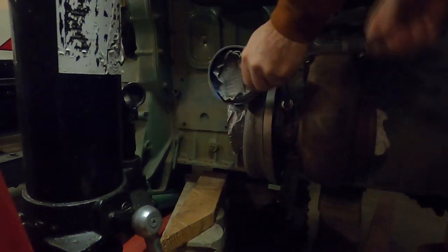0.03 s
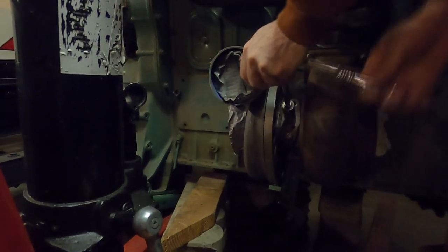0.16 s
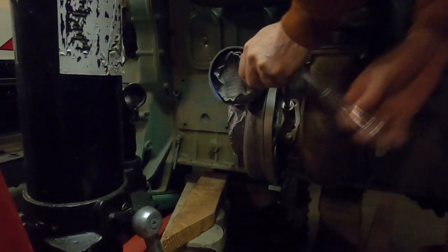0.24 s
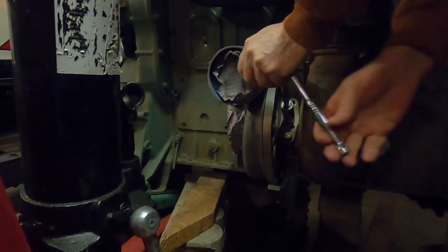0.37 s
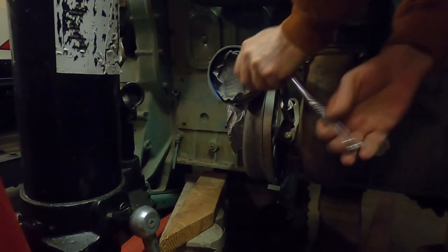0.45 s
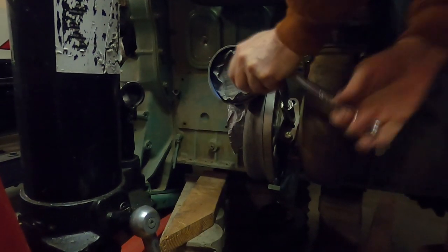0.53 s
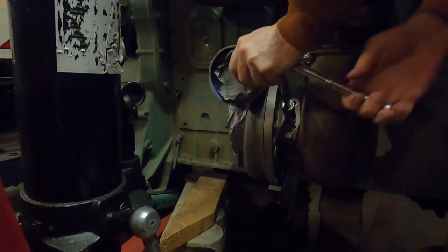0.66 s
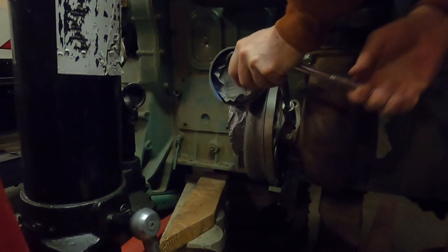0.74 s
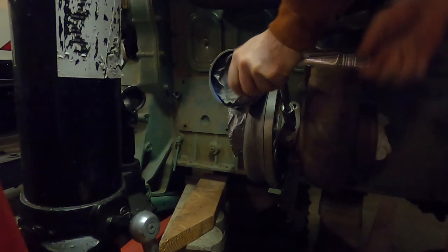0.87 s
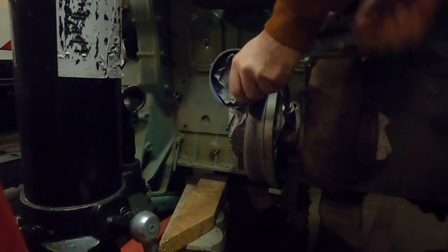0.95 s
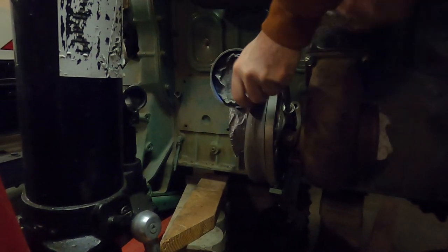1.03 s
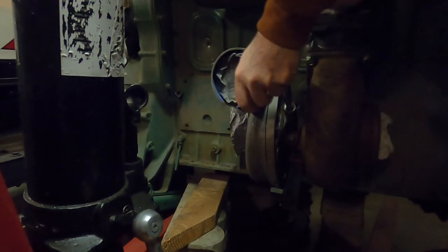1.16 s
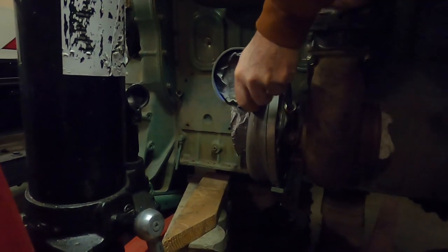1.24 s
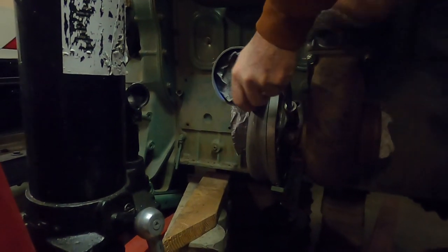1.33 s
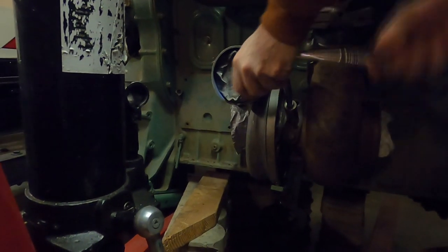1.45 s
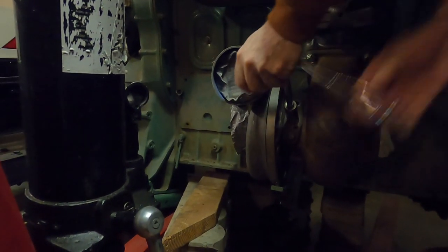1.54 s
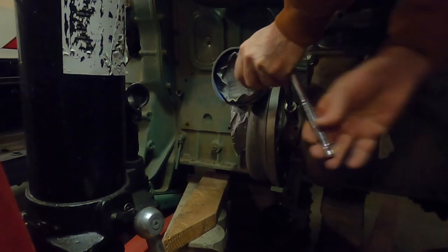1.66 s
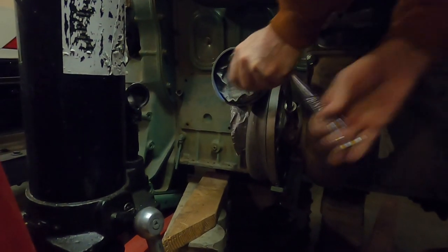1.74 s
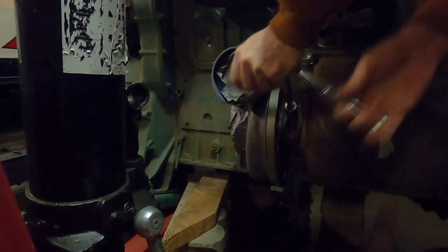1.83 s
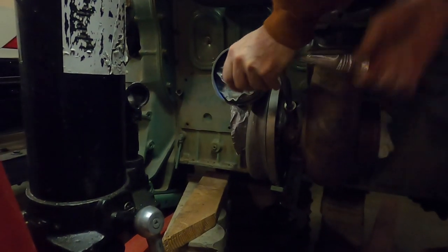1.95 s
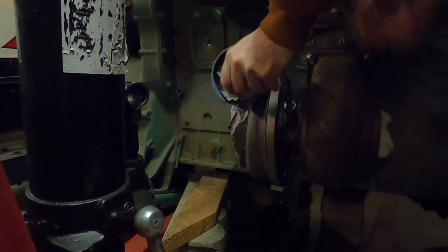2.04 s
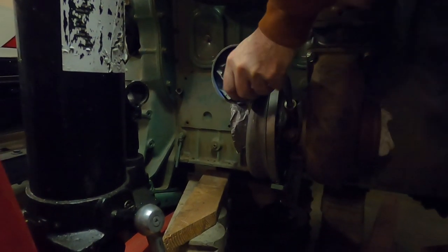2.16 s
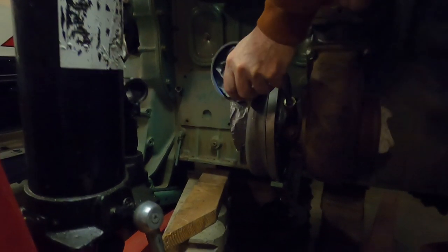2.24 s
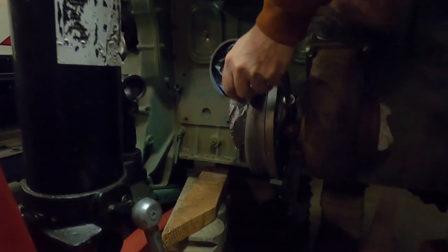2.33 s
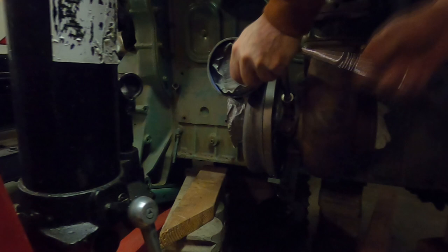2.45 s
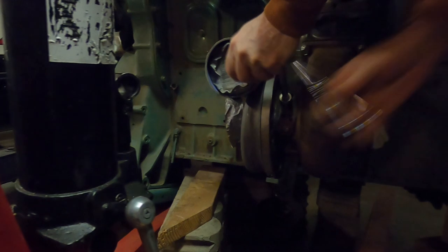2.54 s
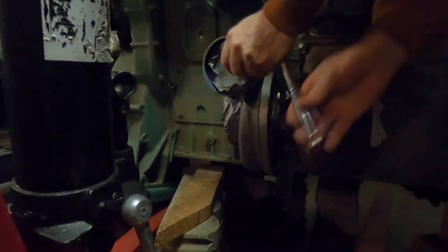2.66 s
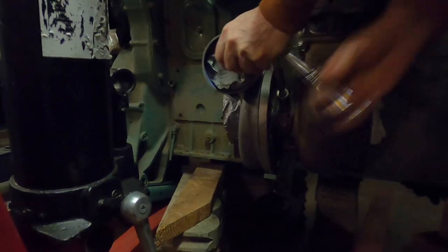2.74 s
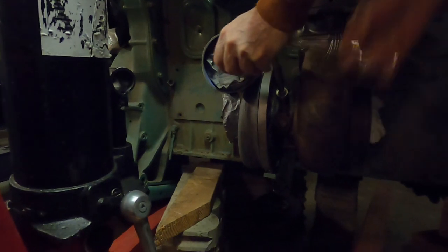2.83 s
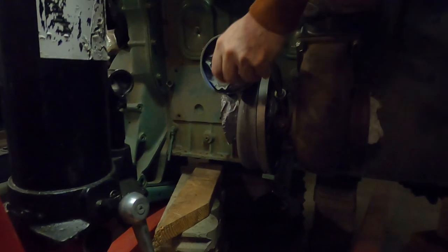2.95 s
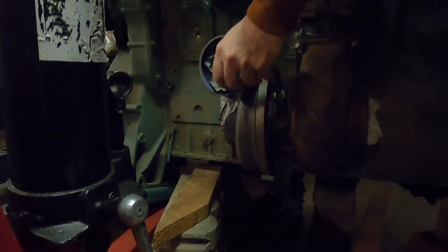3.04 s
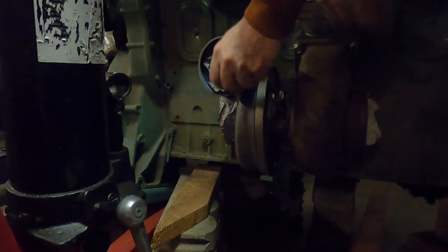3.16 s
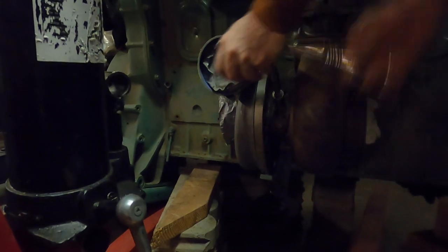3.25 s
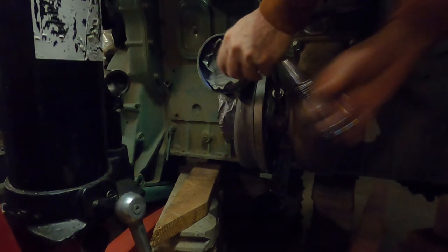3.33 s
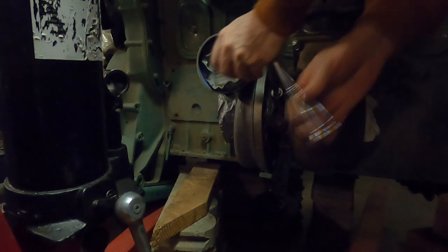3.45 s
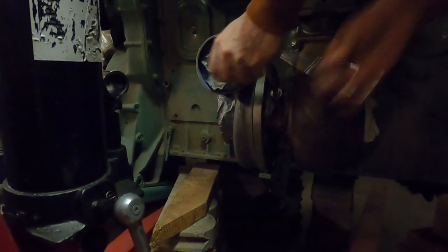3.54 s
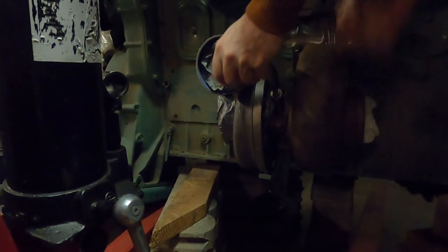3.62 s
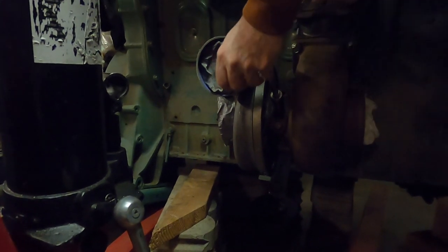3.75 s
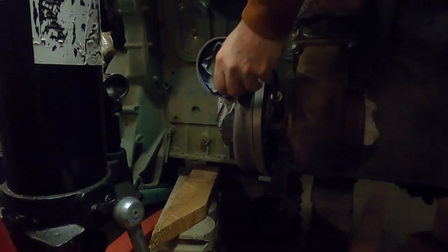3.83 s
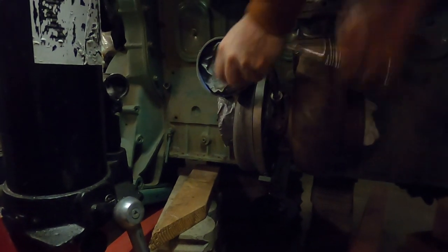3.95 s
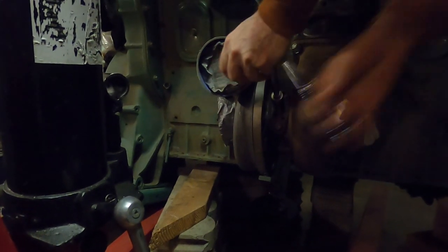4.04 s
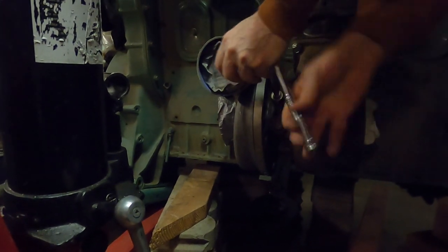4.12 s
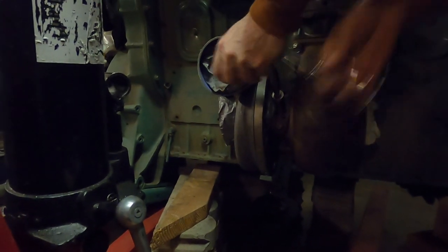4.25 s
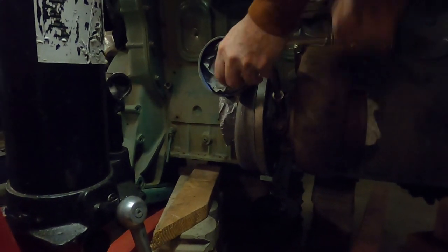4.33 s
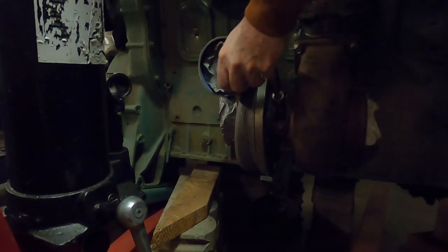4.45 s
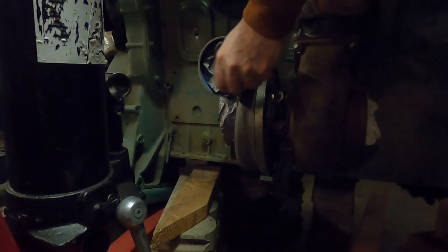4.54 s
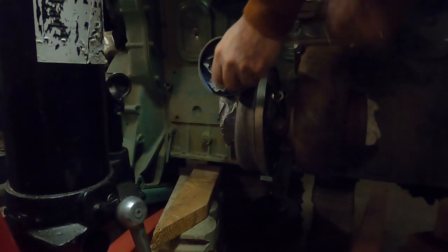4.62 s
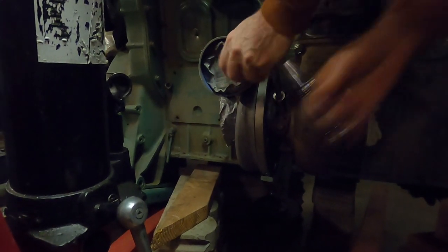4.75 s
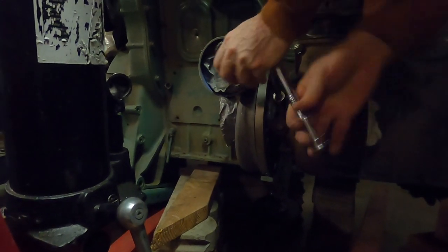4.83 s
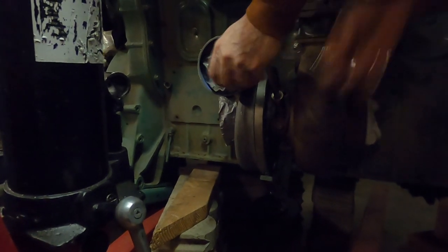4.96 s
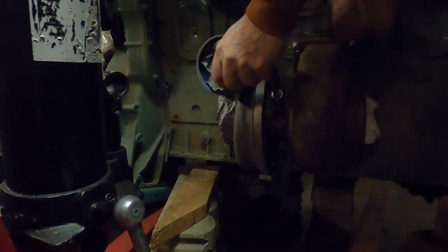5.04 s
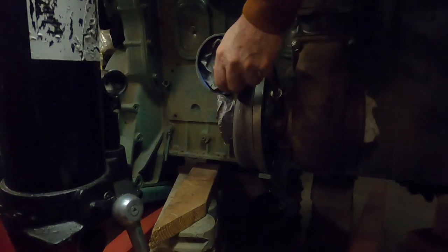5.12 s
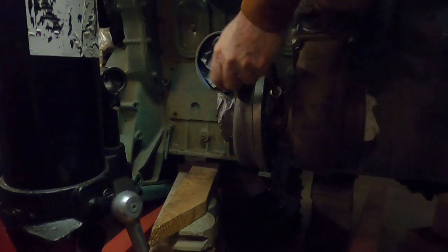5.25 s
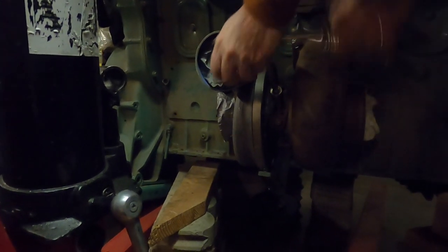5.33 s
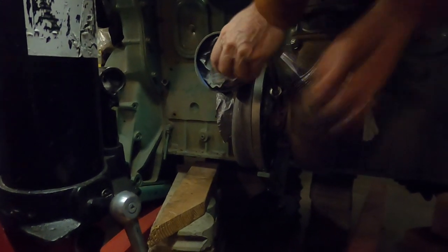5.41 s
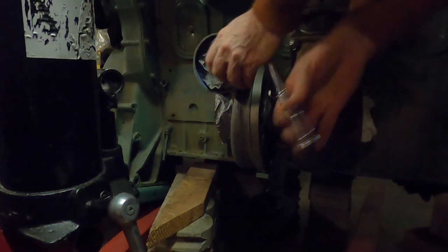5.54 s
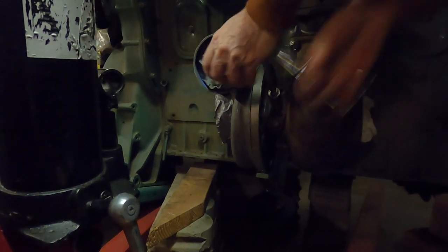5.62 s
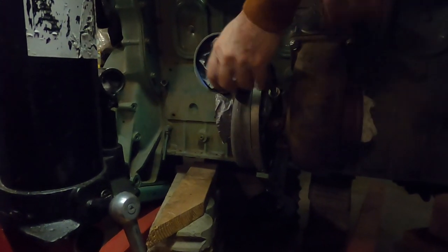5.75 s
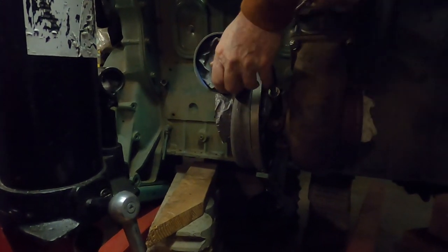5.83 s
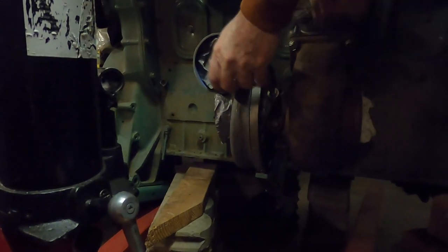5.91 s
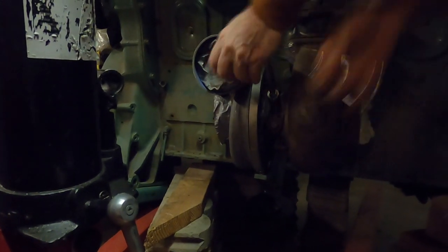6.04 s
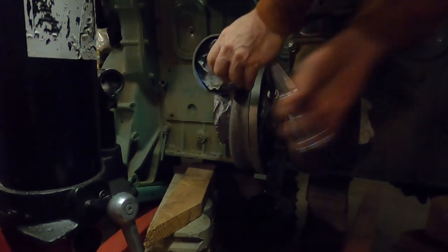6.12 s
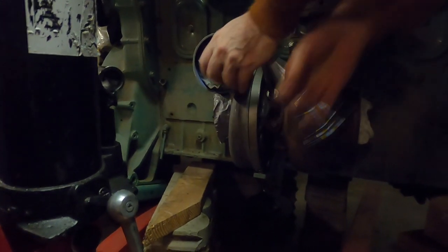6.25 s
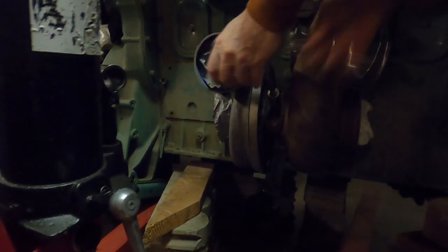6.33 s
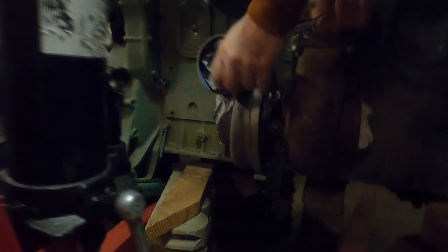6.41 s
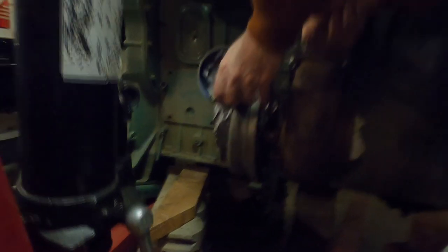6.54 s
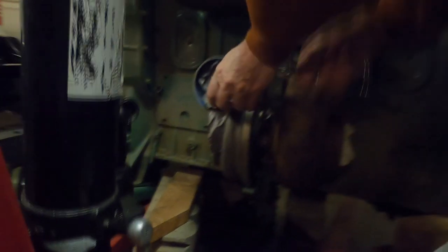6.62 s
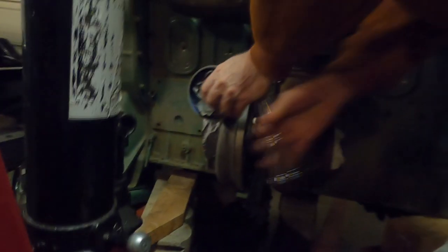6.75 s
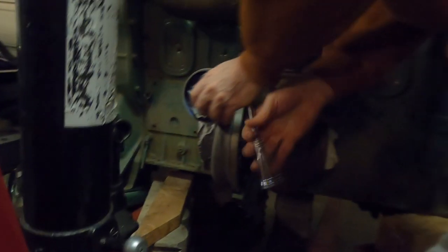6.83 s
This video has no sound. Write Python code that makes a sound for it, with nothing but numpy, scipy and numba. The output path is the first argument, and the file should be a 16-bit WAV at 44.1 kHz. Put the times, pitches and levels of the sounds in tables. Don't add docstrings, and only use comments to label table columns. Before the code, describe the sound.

Close, dry stereo sound of a ratchet wrench on a bolt in a cast gearbox, with short workshop echoes. Clicking starts at once, about twelve bright, ringing snaps until 0.37 s, then a double knock at 0.55. A quieter pull follows with faint rubbing and a soft hum until about 1.9. A strong clank lands at 1.31, and a knock at 1.40 leads into faster clicks to 1.73. Further runs come at 2.4-2.7, 3.2-3.43, 3.93-4.18, 4.67-4.86, 5.33-5.55, 6.04-6.21 and 6.69-6.83. Between them the socket clunks on metal, notably at 2.3, 3.16, 3.56, heavily at 3.87, then 4.57, 5.31, 5.93, 6.31 and 6.85. Gritty thread friction is clearest near 2.1 and 2.9. Cloth brushes faintly at 3.77 and 5.83; soft floor bumps fall at 1.96 and 6.72-6.85. A distant machine rumbles quietly throughout.

```python
import sys
import numpy as np
from scipy import signal
from scipy.fft import rfft, irfft
from scipy.io import wavfile
from scipy.ndimage import uniform_filter1d
from numba import njit

SR = 44100
rng = np.random.default_rng(int(sys.argv[2]) if len(sys.argv) > 2 else 0)


def invert_db(level):
    return 10 ** (np.asarray(level, dtype=float) / 20)


def unload_audio(sound):
    columns = np.transpose(np.atleast_2d(sound))
    steps = np.round(np.clip(columns, -1, 1) * 32767)
    wavfile.write(sys.argv[1], SR, steps.astype(np.int16))


N = 303408
PUSH_S = 0.15

# hz, db_per_hz
SNAP_COLOUR = [(500, -23.5), (1800, 0.5), (5000, 5), (8000, 2.5), (11000, -12), (12500, -10.5),
               (14500, -13), (16000, -25)]
BLOW_COLOUR = [(300, -25), (700, -14), (1500, 3.5), (2800, -4), (4500, -17), (8000, -32.5)]
CLOTH_COLOUR = [(2500, 1), (4500, -2), (7000, -1), (9000, -11.5), (12000, -21)]
# hz, level_db, t60_s
CASE_MODES = [(619.2, -3, 0.11), (747.6, 2, 0.045), (844, -5.5, 0.1), (957.6, -10, 0.14)]
CASTING_MODES = [(1263.6, 3.5, 0.028), (1354, 4, 0.03), (1649, -0.5, 0.11), (1720, -2, 0.12),
                 (1974, -2.5, 0.038), (2215, -5, 0.11), (2306, -9.5, 0.3), (2485, -14, 0.24),
                 (2734, -9.5, 0.23), (3000, -10, 0.1), (3320, -5.5, 0.052)]


def on_log(hz, table, column=1):
    table = np.array(table, float)
    return np.interp(np.log(np.maximum(hz, 1)), np.log(table[:, 0]), table[:, column])


def shape(x, gain):
    n = x.shape[-1]
    return irfft(rfft(x) * gain(np.arange(n // 2 + 1) * SR / n), n)


def noise(spectrum, alike_hz):
    mid, side = rng.standard_normal((2, N))
    side = shape(side, lambda hz: hz / np.hypot(hz, alike_hz))
    top_hz = spectrum[-1][0]
    colour = lambda hz: invert_db(on_log(hz, spectrum)) / np.maximum(hz / top_hz, 1) ** 4
    x = shape(np.array([mid + side, mid - side]), colour)
    return x / np.sqrt(np.mean(x ** 2))


def walk(rate_hz):
    hold = int(SR / rate_hz)
    steps = np.repeat(rng.standard_normal(N // hold + 1), hold)
    return uniform_filter1d(uniform_filter1d(steps, hold), hold)[:N]


@njit
def ring(at, size, pole, rise, keep):
    out, z = np.zeros(N), 0j
    for k in range(len(at)):
        z, push = z * keep, size[k] * (1 - rise[k])
        end = at[k + 1] if k + 1 < len(at) else N
        for i in range(at[k], end):
            z = z * pole[k] + push
            push = push * pole[k] * rise[k] + 1e-30
            out[i] = z.real
            if abs(z.real) + abs(z.imag) + abs(push.real) < 1e-7:
                break
    return out


def contact_rise(contact_ms, count):
    return np.exp(-1000 / (contact_ms * SR)) * np.ones(count)


def strike(s, db, modes, contact_ms, keep=0.61, scatter_db=-1.0, detune=0.032, apart_hz=16000,
           free_db=0, uneven_db=2.0, bend=0):
    out, at = np.zeros((2, N)), (s * SR).astype(np.int64)
    rise = contact_rise(contact_ms, len(s))
    for hz, mode_db, t60_s in modes:
        chance = rng.standard_normal((len(s), 6)).T
        mode_hz = hz * (1 + bend / 100 + detune * chance[0])
        ring_s = t60_s * invert_db(free_db + uneven_db * chance[1])
        pole = np.exp(2j * np.pi * mode_hz / SR - np.log(1000) / (ring_s * SR))
        size = invert_db(db + mode_db + scatter_db * chance[2]) * np.exp(3j * chance[3])
        skew = np.exp(hz / apart_hz * (1j * chance[4] + 0.15 * chance[5]))
        out += [ring(at, size * port, pole, rise, keep) for port in (skew, 1 / skew)]
    return out


def burst(s, db, t60_s, contact_ms):
    pole = np.full(len(s), np.exp(-np.log(1000) / (t60_s * SR)) + 0j)
    return ring((s * SR).astype(np.int64), invert_db(db) + 0j, pole, contact_rise(contact_ms, len(s)), 0.6)


def lead_in(s, db, t60_s):
    return burst(N / SR - s[::-1], db[::-1], t60_s, 0.27)[::-1]


def machine():
    # start_s, level_db
    load = [(0.0, -52), (0.04, -56), (1.609, -62), (1.82, -57), (2.51, -61.5), (2.97, -52), (3.01, -60.5),
            (3.27, -54), (3.39, -61.5), (3.64, -53), (3.68, -62.5), (4.88, -60), (5.17, -66.5),
            (5.23, -59.5), (6.86, -59.5), (6.88, -55.5)]
    # hz, db_per_hz
    roar_colour = [(20, -3.5), (40, -4), (90, -6), (200, -7.5), (350, -18), (1200, -38.5)]
    # order_hz, width_hz, level_db
    shaft = [(42.3, 7.8, -6), (84.4, 12, 7.5), (131, 14, -3), (180, 11, -7)]
    level_db = np.interp(np.arange(N) / SR, *np.transpose(load))
    orders = lambda hz: sum(invert_db(db + 8.0) / np.hypot(1, 2 * (hz - f) / width) ** 2 for f, width, db in shaft)
    roar = noise(roar_colour, 550)
    rumble = roar * invert_db(0.49 * (level_db.mean() - level_db)) + shape(roar, orders) * invert_db(2.3 * walk(8.0))
    return rumble / np.std(rumble) * invert_db(level_db + 2.0 + 0.86 * walk(9.0) + 2.0 * walk(30))


def effort(column, floor_db):
    # start_s, end_s, thread_rub_db, cloth_hiss_db
    drives = [
        (0.405, 0.732, -67, -75.5),
        (0.787, 1.27, -75, -88),
        (1.988, 2.267, -64.5, -94),
        (2.756, 3.095, -62, -97),
        (3.496, 3.71, -84, -96),
        (4.253, 4.547, -80.5, -91.5),
        (5.045, 5.279, -91.5, -97),
        (5.658, 5.804, -84, -87),
        (6.347, 6.543, -66.5, -84),
    ]
    t = np.arange(N) / SR
    hump = lambda start, end: np.clip(np.minimum(t - start, end - t) / PUSH_S + .5, 0, 1)
    return invert_db(floor_db) + sum(invert_db(row[column]) * hump(row[0], row[1]) for row in drives)


def thread():
    # hz, db_per_hz
    rub_colour = [(500, -14.5), (900, -6), (1400, 1.5), (2200, -2.5), (3000, -14.5), (5000, -25)]
    return noise(rub_colour, 2500) * effort(column=2, floor_db=-76.5) * invert_db(-7.0 + 2.0 * walk(50))


def cloth():
    return noise(CLOTH_COLOUR, 4000) * effort(column=3, floor_db=-85) * invert_db(3.5 + 1.5 * walk(27))


def teeth():
    # start_s, snap_db, low_ring_db, high_ring_db, head_db (last three over snap)
    swing_1 = [(0.0002, -48, -18.5, -17, -22.5), (0.0114, -32.5, 2.5, 9, 1.5), (0.0376, -33, -11.5, 8, -2),
               (0.0698, -33, -16, 11, -5.5), (0.102, -33, -14.5, 14, 3), (0.138, -34, -20, -9.5, -9.5),
               (0.175, -33, -13.5, -10, -12.5), (0.2109, -34, 4.5, -3.5, -14.5),
               (0.246, -37, 0.5, -18, -14), (0.284, -35, -8.5, -25.5, 0), (0.325, -35.5, -9, -19.5, 5),
               (0.3706, -34.5, 2.5, 9.5, 7.5)]
    swing_2 = [(1.4174, -34, 3, -1.5, 5), (1.4382, -35.5, 5, 4.5, 5), (1.4569, -35.5, 5.5, 8, 15.5),
               (1.4764, -36, 1.5, -2, 9.5), (1.5006, -36, -7, 10.5, 9), (1.5291, -38.5, 8.5, 9.5, 15),
               (1.557, -35.5, 6, -2.5, 11), (1.5824, -34, 11, 8.5, 2), (1.6065, -33.5, 12.5, 9.5, 1),
               (1.6284, -38, 16.5, 16, 11), (1.6535, -33.5, 11, 9, -5.5), (1.6826, -34.5, 10, 9.5, -3),
               (1.73, -35, 11, 8, 11)]
    swing_3 = [(2.4021, -37, 6.5, 13, -5), (2.4259, -41, 12, 12, 7), (2.4476, -37, 7.5, -16, 5),
               (2.467, -37.5, 8, 1, 9.5), (2.4862, -38, 3, 2, 7), (2.5061, -38.5, 8, -17, -3),
               (2.53, -36.5, -7, -12, -9), (2.5553, -36.5, -1, -23, -9), (2.5767, -38.5, 6.5, -14.5, -14),
               (2.5983, -35, 3.5, -15, -14), (2.6216, -36.5, 0.5, -5, -19), (2.6454, -38.0, -2.5, 1, -21),
               (2.6843, -39.5, 1, 5.5, -6.5)]
    swing_4 = [(3.2036, -65, 23, 11, -22), (3.22, -63.5, 23, 13, -13.5), (3.2421, -33.5, 8.5, -1, -22),
               (3.258, -34.5, 1, 18.5, -2), (3.2745, -36.5, -10, 18, -1), (3.29, -31, -10, 10, -9),
               (3.3055, -35, 0, -5.5, 2.5), (3.3208, -34.5, 0, -4.5, -5), (3.3395, -34, 6, 10.5, -12.5),
               (3.3597, -36.5, -11, 5, -16), (3.3799, -34.5, -3, -13, -2), (3.4027, -38, 5.5, 0, -8.0),
               (3.432, -36, -3, -16, 0)]
    swing_5 = [(3.9308, -46, 4, -3, -22.5), (3.967, -34, -9.5, -5, -10.5), (3.9874, -36.5, -13, -10, 0.5),
               (4.003, -37.5, -1, 9.5, 12), (4.0173, -35.5, -2.5, -15, 13), (4.0299, -38, 11.5, -4.5, 21.5),
               (4.044, -34, 0.5, -24, 7.5), (4.0593, -30, 1.5, 2, 6), (4.0769, -33.5, -6, -4, -4),
               (4.0958, -30.5, 1.5, 5, 7.5), (4.1164, -33, 10.5, 7, 7.5), (4.1392, -32, 4, 5.5, 5),
               (4.1815, -36, 7, 7, 2)]
    swing_6 = [(4.668, -36.5, 7.4, 18.5, -6.5), (4.688, -30.5, 1.5, 9.5, -9.5), (4.707, -35, 10, 17.5, 0.5),
               (4.7234, -35, 12, 16.5, -20), (4.7395, -36.5, 12, 8, 5.5), (4.756, -34.5, 5.5, -3.5, -7),
               (4.7712, -32, 10.8, 9, 1), (4.7912, -35.5, 13, -0.5, -2.5), (4.8119, -31.5, 9, -11, 2),
               (4.8315, -32.5, 5.6, -6, 3), (4.8553, -35.5, 7.4, -12.5, 0.5)]
    swing_7 = [(5.3344, -42, 7.5, 8, -22), (5.3577, -35.5, 2.5, -12, -11), (5.3774, -35.5, 3.5, -10, -9),
               (5.3916, -37.5, 9, 6, -10), (5.4051, -35.5, 9, -16, -24), (5.421, -34, 7.5, 16.5, -14.5),
               (5.4339, -31, 0.5, 4, -21), (5.4497, -32.5, -0.5, -0.5, -20), (5.4647, -34, 5, 6.5, -23),
               (5.4836, -32.5, 2.5, 5, -17.5), (5.5024, -35, -4, 14, -5), (5.524, -33.5, 1.5, 7, -1.5),
               (5.5486, -38, 1, 15, 4), (5.627, -59.5, 14.5, 19, -22)]
    swing_8 = [(6.038, -36, -16, 6.5, -1.5), (6.055, -36.5, -8, 9.5, 7), (6.0677, -40.5, 1.5, 14, 5),
               (6.0803, -37.5, 1.5, 8, 7.5), (6.0931, -32.5, -18, -17.5, 2), (6.108, -38.5, 5, 4, 10),
               (6.1242, -35, -12, -8, 2), (6.1418, -37, -8, -24, 0), (6.1638, -36, -4.5, 6, 9),
               (6.187, -35, 5.5, 8, 11.5), (6.2127, -37.5, 8, 9, 14.5)]
    swing_9 = [(6.6852, -35, 3, 4, 7.5), (6.7047, -36.5, 3, 6, 8.5), (6.72, -30, 1, 3, 0.5),
               (6.7355, -30.5, 2.5, 13, 5), (6.7486, -32.5, 1.5, 10, 11.5), (6.762, -33, 2.5, 14.5, 10),
               (6.779, -28.5, 0.5, 7, 2.5), (6.7945, -34, 12, 7.0, -7), (6.8118, -31, 9.5, 10, -10.5),
               (6.8333, -32.5, 3.5, 9, -9.5)]
    # pawl_landing_ms, low_ring_neighbours_db, tooth_chirp_db, lowest_casting_modes_db
    landings = [(0.71, 1, 4, -1.5), (0.43, -3.5, -5.5, -2), (.5, 4, 3.5, 0.5), (0.8, 8, -4, 5.5),
                (0.65, 5, -4, 1.5), (.7, -5, -4.5, -1), (0.95, 4.5, -1, 0), (0.93, 4.5, -11, 1.5),
                (0.87, 0, -5, 0)]
    bends = [(.6, .6), (0, -.3), (.2, .2), (0, 1), (0, -.3), (0, 0), (.6, .9), (0, 1.2), (0, -.1)]
    # first_tooth_db, midway_db, last_tooth_db
    slacks = [(-4, -3, -6), (-0.5, 4, -2), (1.5, 1, 3.5), (-9.5, -4.5, -4), (-6, -3, -1), (0, 3.5, 3.5),
              (-1, -3, -4.5), (0, 3.5, 1), (5.5, -1, -0.5)]
    # first_tooth_db, midway_db, last_tooth_db
    covers = [(6, -10.5, 2), (2.5, -1.5, 1), (-1, 4, -7.5), (-2.5, 0.5, -2.5), (-9.5, -4.5, 2),
              (-5.5, 1, -2), (-16, -1.5, -6), (0, -4, 8), (-5.5, -0.5, -4)]
    # first_tooth_db, midway_db, last_tooth_db
    presses = [(-5.5, -13.5, -4.5), (-4, -4.5, -4), (-1.5, 1.5, 0.5), (-3, -5.5, -2), (-17, -7.5, -2),
               (1, -5, -3.5), (0, -6.5, -12), (-5, -7.5, -3), (-8, -5, -5)]
    swings = [swing_1, swing_2, swing_3, swing_4, swing_5, swing_6, swing_7, swing_8, swing_9]
    blocks = []
    for swing, landing, bend, *grip in zip(swings, landings, bends, slacks, covers, presses):
        columns = np.transpose(swing)
        s = columns[0]
        steady = np.outer([*landing, *bend], np.ones(len(s)))
        sliding = [np.interp(s, np.linspace(s[0], s[-1], len(hold)), hold) for hold in grip]
        blocks.append(np.vstack([columns, steady, sliding]))
    rows = np.hstack(blocks)
    rows[-1] += 2.5 * rng.standard_normal(rows.shape[1])
    return rows


def pawl():
    # hz, level_db, t60_s
    low_ring = [(3874, 1.5, 0.048)]
    low_neighbours = [(4094, -7, 0.027), (3758, -9.5, 0.039)]
    high_ring = [(6975, 1.5, 0.036), (7130, -7, 0.04)]
    head_modes = [(9150, -2.5, 0.01), (9570, -3.5, 0.024), (9840, -4, 0.029)]
    cover_plate = [(10636, -1.5, .035), (11040, -6, 0.033)]
    # hz, level (added as db), t60_s
    overtones = [(13600, 0.0039, .02), (14500, 0.0036, .025)]
    # hz, level_db, t60_s
    tooth_chirps = [(5280, 2, 0.0076), (2120, -5, 0.017)]
    s, db, low, high, head, land_ms, near, chirp, deep, low_bend, high_bend, slack, cover, body = teeth()

    crack = burst(s, db + 1.0, 0.015, land_ms) + burst(s, db - 3.0, 0.066, 0.66 * land_ms)
    crack += lead_in(s, db - 1.0, 0.0064)
    rattle = noise(SNAP_COLOUR, 8000) * crack * invert_db(1.9 * walk(900))
    shake = noise(BLOW_COLOUR, 4700) * burst(s, db + body - 3.5, 0.099, 12.0)

    steady = .004
    handle = strike(s, db + low + 0.5, low_ring, 0.71 * land_ms, keep=0.15, scatter_db=0.44, detune=steady,
                    free_db=slack + .15 * (low - 6.0), uneven_db=-0.5, bend=low_bend)
    handle += strike(s, db + low + near - 0.6, low_neighbours, 0.43 * land_ms, keep=.15, scatter_db=4.0,
                     detune=0.017, free_db=0.65 * slack)
    handle += strike(s, db + high + 0.15, high_ring, 0.8 * land_ms, keep=.3, scatter_db=2.0, detune=steady,
                     free_db=0.58 * slack + 1.0, uneven_db=0.8, bend=high_bend)
    handle = handle * invert_db(1.8 * walk(300))

    loose = strike(s, db + head + 1.0, head_modes, 1.3 * land_ms, keep=0.35, scatter_db=3.0, detune=0.019,
                   apart_hz=9000)
    loose += strike(s, db + cover - 0.5, cover_plate, 0.12, keep=.3, scatter_db=1.5, detune=steady,
                    apart_hz=8000)
    loose += strike(s, db + .4 * head - 10.0, overtones, .6, detune=0.011)
    loose += strike(s, db + chirp, tooth_chirps, 0.67 * land_ms, keep=0, scatter_db=3.0, detune=0.05)
    loose = loose * (1 + .55 * walk(900))

    gearbox = strike(s, db + body - 17.5, CASE_MODES, 0.71, scatter_db=-1.0)
    gearbox += strike(s, db + body + deep - 9.5, CASTING_MODES[:2], 1.1, keep=0.8, scatter_db=3.5,
                      detune=0.01, free_db=1.5)
    gearbox += strike(s, db + body - 11.0, CASTING_MODES[2:], 1.0, keep=0.99, scatter_db=3.0,
                      detune=0.008, free_db=1.0)
    return rattle + shake + handle + loose + gearbox


def room(x):
    # band_hz, t60_s, level_db
    echo_bands = [(316, 0.27, -11.5), (960, 0.35, -20), (3050, 0.2, -20), (6050, 0.29, -14),
                  (11730, 0.22, -21.5)]
    t = np.arange(SR // 2) / SR
    echo = 0
    for hz, t60_s, db in echo_bands:
        band = shape(rng.standard_normal((2, len(t))), lambda f: np.exp(-np.log2((f + 1) / hz) ** 2))
        band = band * np.exp(-np.log(1000) * t / t60_s) * np.clip(t / 0.0033, 0, 1)
        echo = echo + invert_db(db) * band / np.sqrt(np.sum(band ** 2) / 2)
    echo = echo + 0.32 * echo[::-1]
    return signal.fftconvolve(x.mean(axis=0)[None], echo, axes=1)[:, :N]


def socket():
    # start_s, blow_db, case_db, rattle_db, upper_casting_db (last three over blow)
    knocks = [(0.5436, -42, -34, -10, -4.5), (0.5567, -31.5, -15, -6.5, -5), (1.2985, -51.5, -19, 3, 0),
              (1.3089, -21, -10.5, 5, 6.5), (1.396, -29, -18, -22, -18.5), (1.7886, -42, -8, -17, -16.5),
              (1.82, -39.5, -11, -14, -5), (1.8327, -33, -16.5, -11.5, -10.5),
              (2.3041, -26.5, -22, -14.5, -5), (2.7668, -35, -38.5, -18, -4.5),
              (3.156, -26, -15, -20, -11.5), (3.2004, -42.5, -28, 1, -12), (3.22, -37.5, -28, -5, 3.5),
              (3.5512, -42, -32, 11.5, 2), (3.558, -28, -23, -38, -25), (3.5649, -26.5, -24, -9.5, -4),
              (3.8553, -58, -14, -9, -3.5), (3.8661, -19, -13.5, -10, -8), (4.2512, -35.5, -15, -10, -5),
              (4.561, -57, -17.5, -4.5, -10), (4.5719, -24.5, -11, -6, 3), (4.962, -36.5, -24, -23, -25),
              (4.966, -30, -22.5, -14.5, -0.5), (5.029, -44, -18, -2.5, 4), (5.047, -53, -25, 2.5, -12.5),
              (5.069, -56, -26.5, 6, -19.5), (5.075, -46, -27, 5.5, -4.5), (5.3066, -25.5, -13.5, -8, -6.5),
              (5.637, -27.5, -20.5, -28, -14), (5.6512, -33.5, -38, -15.5, 2.5),
              (5.9349, -25, -28, -19.5, -1), (5.9892, -40, -21, -8, -9), (6.006, -35, -14, -20, -4.5),
              (6.278, -28.5, -28, -11, -5), (6.3112, -24.5, -14, -31, -4.5), (6.3977, -55.5, -22, 6, -14),
              (6.574, -30.5, -8, -20, -27), (6.6458, -33, -12, -18, -30), (6.846, -25.5, -18, -20, -10)]
    # start_s, lowest_casting_modes_db
    flange_hits = [
        (.5565, -4.5),
        (1.396, -11),
        (1.8325, -4.5),
        (2.3053, -14),
        (3.8659, 1),
        (5.3059, -1.5),
        (5.9349, 0),
        (6.574, 5),
    ]
    # hz, db_per_hz
    chink_colour = [(2500, -13), (4500, 0.5), (5600, -6.5), (6500, -4.5), (8500, -14), (11000, -24)]
    # hz, level_db, t60_s
    socket_modes = [(3760, -2, 0.12), (4150, -3, .12), (4240, -9, .12), (4730, -3.5, 0.11),
                    (4670, -1.5, 0.05), (4830, -3.5, 0.079), (5450, -4, 0.099), (6700, -8.5, .03)]
    s, db, thud, rattle, upper = np.transpose(knocks)
    grit = invert_db(5.4 * walk(500))
    blow = burst(s, db - 7.5, 0.038, 4.8) + burst(s, db - 21.0, 0.29, 29.0) + lead_in(s, db - 39.5, 0.12)
    blow = noise(BLOW_COLOUR, 7000) * blow * grit
    chink = burst(s, db + rattle - 7.5, 0.043, 1.5) + burst(s, db + rattle - 17.5, 0.071, 3.6)
    chink = noise(chink_colour, 12000) * chink * grit

    steady = .0015
    flange = sum(more_db * (np.abs(s - at_s) < .005) for at_s, more_db in flange_hits)
    body = strike(s, db + thud - 3.5, CASE_MODES, 1.1, scatter_db=-1.0, keep=0.56, detune=steady)
    body += strike(s, db + flange - 13.0, CASTING_MODES[:2], 0.39, keep=0.68, scatter_db=2.0, detune=steady)
    middle_db = db - 17.0 - 0.16 * (thud + 21)
    body += strike(s, middle_db, CASTING_MODES[2:5], 1.8, keep=0.68, scatter_db=-2.0, detune=steady)
    body += strike(s, db + upper - 15, CASTING_MODES[5:7], 1.1, keep=1.0, scatter_db=1.5, detune=steady)
    body += strike(s, db + upper - 9.5, CASTING_MODES[7:], 0.81, keep=0.82, scatter_db=0.7, detune=steady)
    body += strike(s, db + rattle - 16.5, socket_modes, 0.51, keep=0.9, detune=steady)
    buzzing = body * (1 + 0.5 * walk(250))
    return shape(blow + chink + buzzing, lambda hz: 1 / np.hypot(1, (hz / 9000) ** 5))


def sleeve():
    # start_s, level_db
    grit_ticks = [(0.559, -42.5), (.589, -56), (0.853, -61.5), (1.057, -64.5), (1.899, -70), (1.963, -65),
                  (2.339, -60), (2.815, -58.5), (4.572, -60), (4.625, -58), (5.047, -66), (5.068, -63),
                  (5.078, -58)]
    # centre_s, level_db
    swishes = [
        (3.77, -75.5),
        (5.2, -83.5),
        (5.83, -76),
    ]
    t = np.arange(N) / SR
    swell = sum(invert_db(db + 3.5) * np.exp(-((t - s) / 0.052) ** 2) for s, db in swishes)
    tick_s, tick_db = np.transpose(grit_ticks)
    return noise(CLOTH_COLOUR, 4000) * swell + noise(SNAP_COLOUR, 9800) * burst(tick_s, tick_db, 0.025, 0.48)


def drone():
    # start_s, end_s, pitch_hz, width_hz, level_db
    hum_span = (0.63, 1.9, 176.5, 9.5, -65)
    start, end, hz, width, db = hum_span
    t = np.arange(N) / SR
    hum = shape(rng.standard_normal(N), lambda f: 1 / (1 + (2 * (f - hz) / width) ** 2))
    return hum / np.std(hum) * invert_db(db) * np.clip(np.minimum(t - start, end - t) / PUSH_S, 0, 1)


def bumps():
    # start_s, level_db, upper_modes_db (over level)
    drops = [
        (1.9613, -41, 3),
        (6.722, -46.5, -9),
        (6.775, -43, -10),
        (6.845, -49, 1),
    ]
    # hz, level_db, t60_s
    floor_modes = [(206, -2, 0.077), (250, -18, 0.053), (299, -10, 0.09), (377, -3.5, 0.036),
                   (472, -8.5, .03), (618, -4.5, 0.0467), (815, -10.5, 0.034)]
    s, db, upper = np.transpose(drops)
    deep = strike(s, db, floor_modes[:2], 2.0, scatter_db=-3.0, detune=0.02)
    return deep + strike(s, db + upper, floor_modes[2:], 1.23, scatter_db=2.5, detune=.01)


def scene():
    wrench = pawl() + socket() + bumps()
    return wrench + room(wrench) + machine() + thread() + cloth() + drone() + sleeve()


def roll_off(x):
    return signal.sosfilt(signal.butter(12, 16660, fs=SR, output="sos"), x)


def record(dry):
    # hz, level_db, lag_rad (beyond the path)
    ports = [(500, 0.05, 0), (4500, 0.65, -0.11), (6240, .5, 0), (7430, 0.3, 0.72), (9200, -2.5, -.9),
             (11100, -4, -0.39), (13500, -4.5, -.5), (16000, -6.5, 0)]
    path_samples = 2.094
    lag = lambda hz: 2 * np.pi * hz * path_samples / SR + on_log(hz, ports, column=2)
    left = shape(dry[0], lambda hz: invert_db(on_log(hz, ports)) * np.exp(-1j * lag(hz)))
    right = shape(dry[1], lambda hz: invert_db(-on_log(hz, ports)))
    rounded = np.tanh(2.006 * np.array([left, right])) / 1.63
    return roll_off(shape(rounded, lambda hz: 1 / np.hypot(1, (hz / 15900) ** 70)))


dry = scene()
out = record(dry)
unload_audio(out)
```